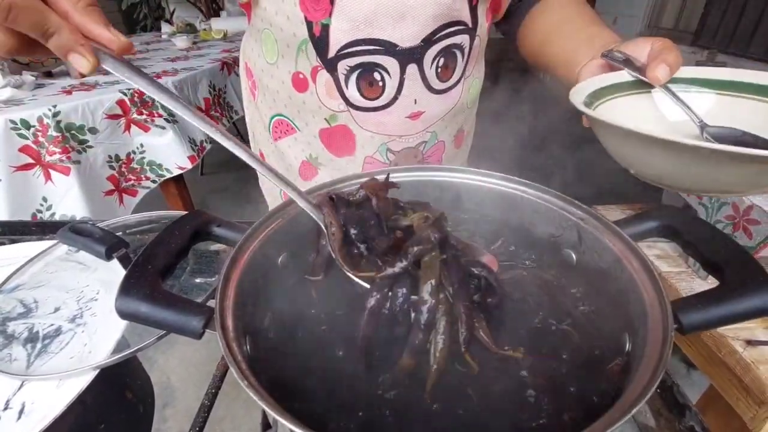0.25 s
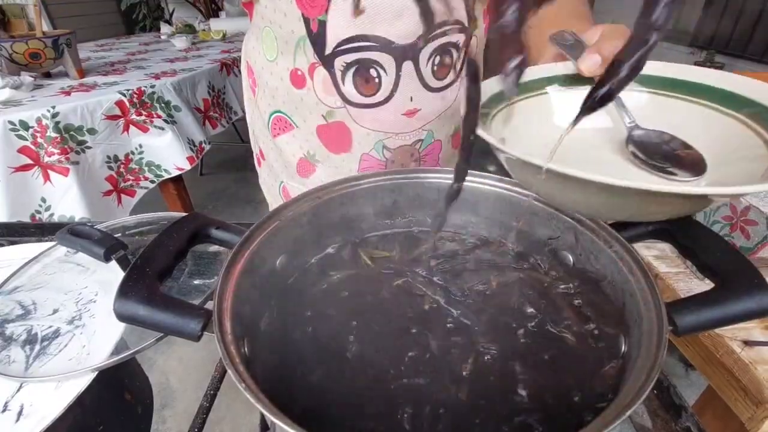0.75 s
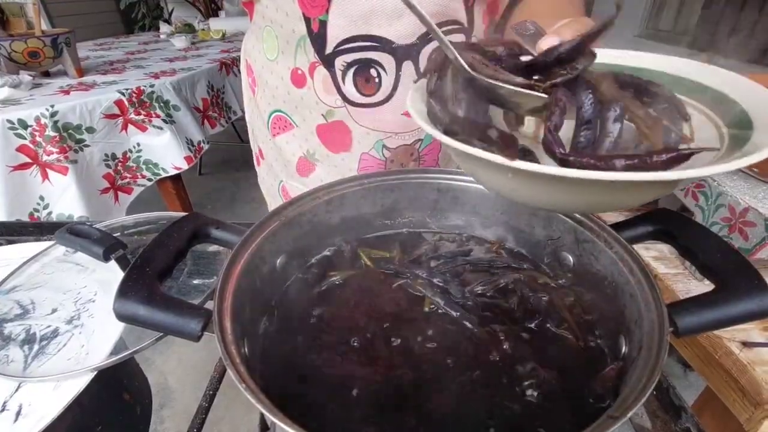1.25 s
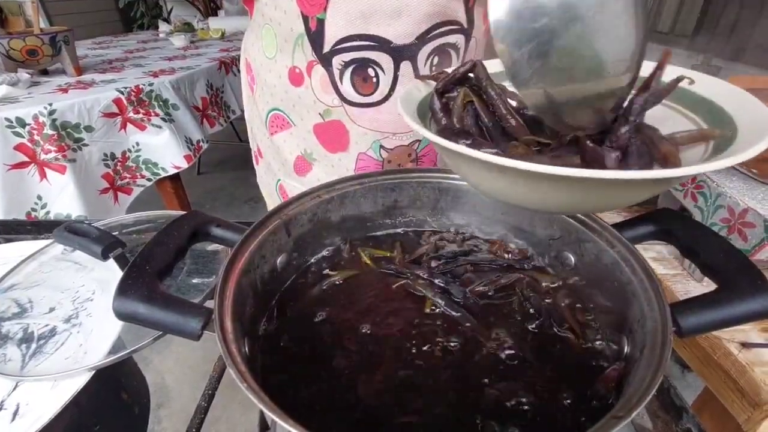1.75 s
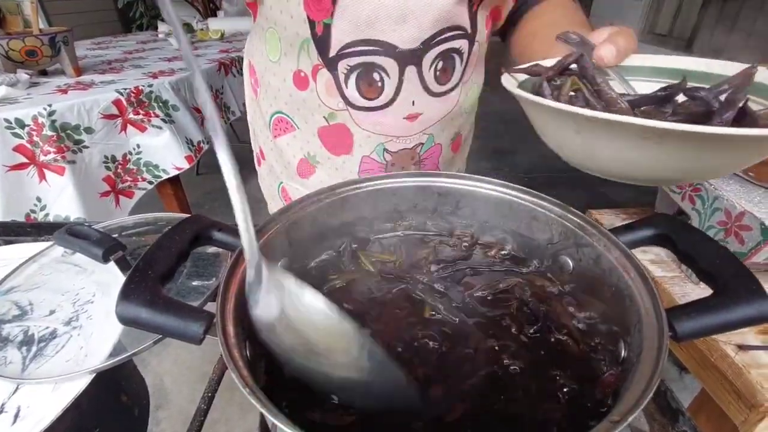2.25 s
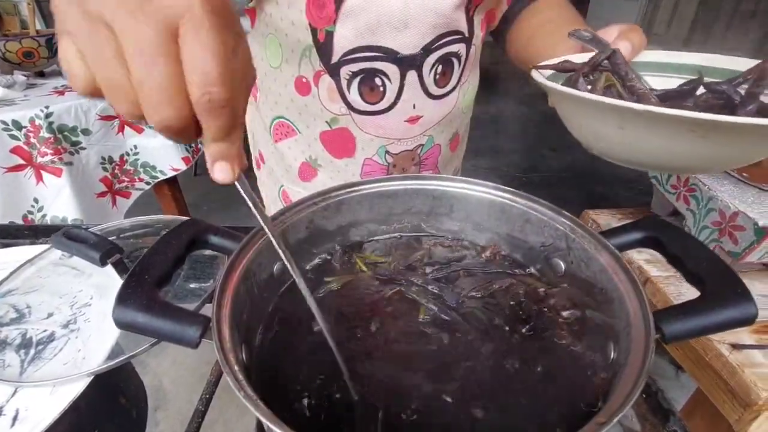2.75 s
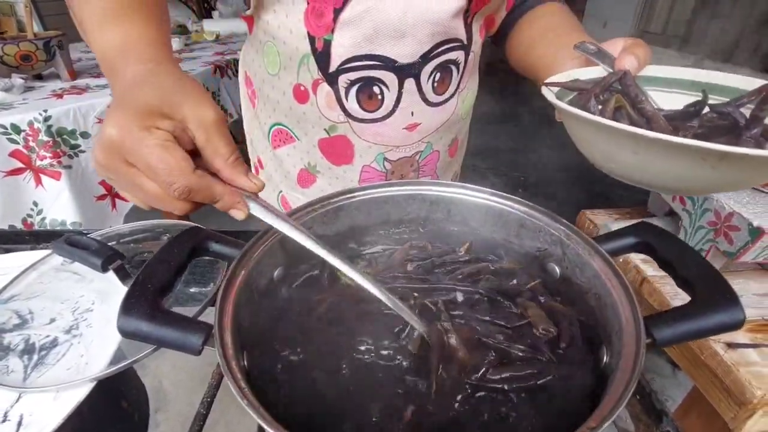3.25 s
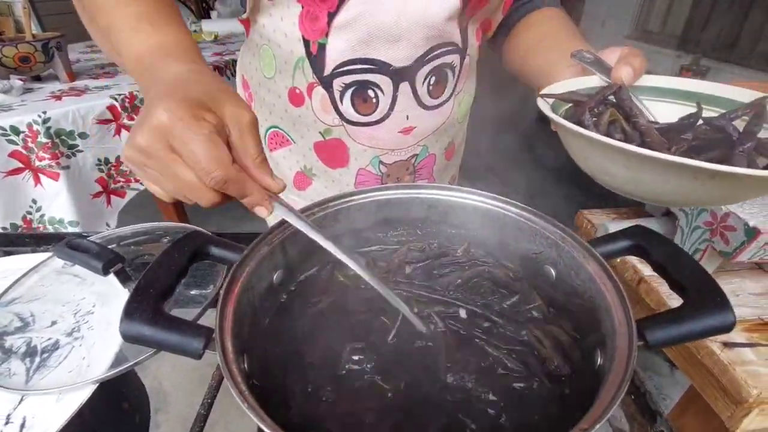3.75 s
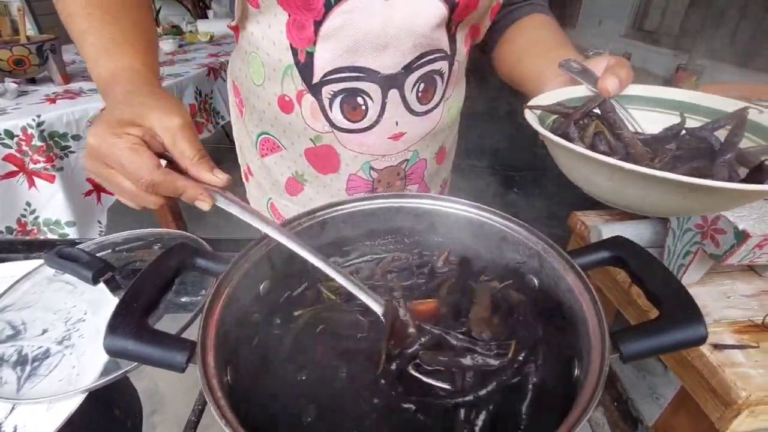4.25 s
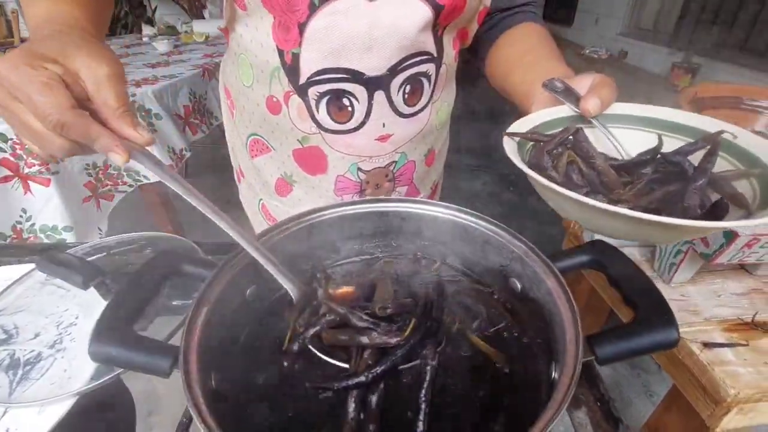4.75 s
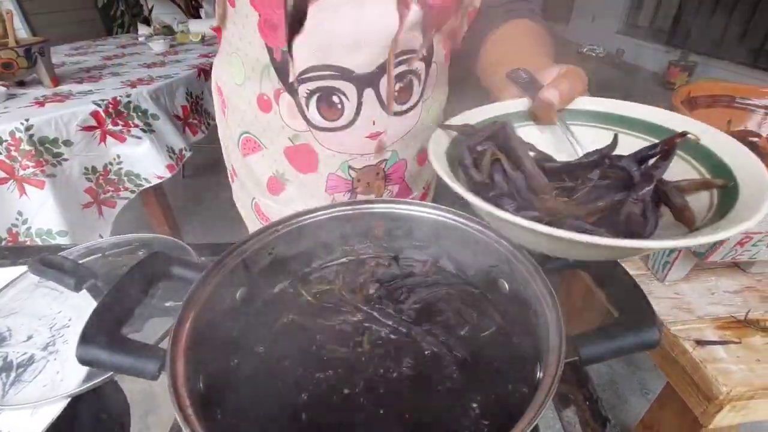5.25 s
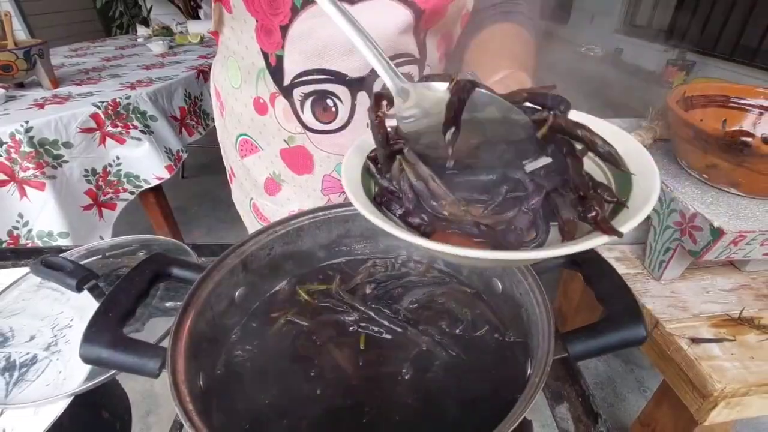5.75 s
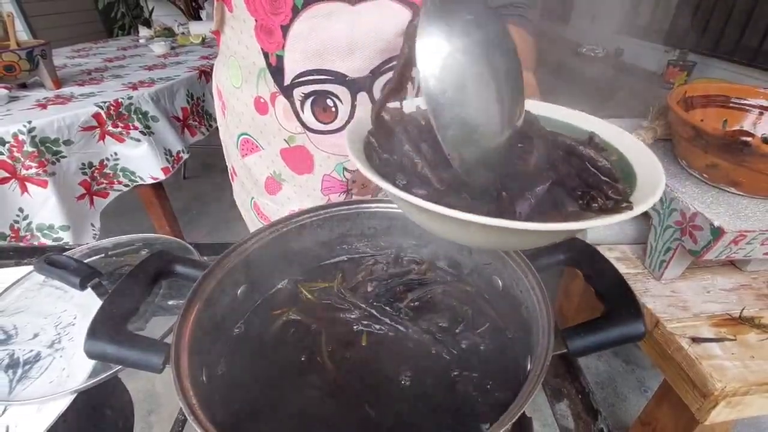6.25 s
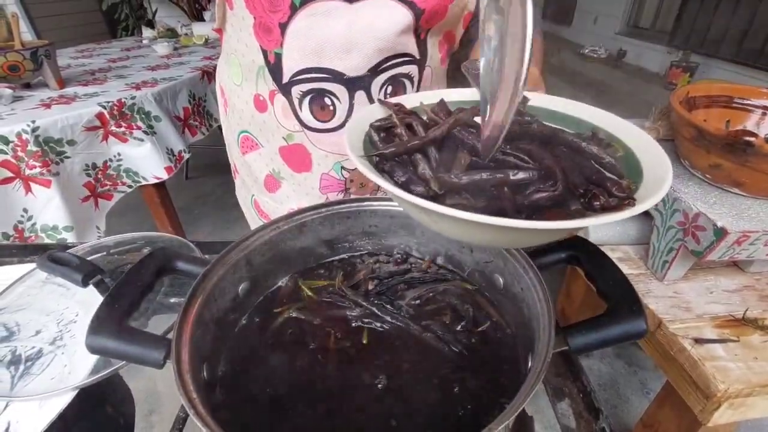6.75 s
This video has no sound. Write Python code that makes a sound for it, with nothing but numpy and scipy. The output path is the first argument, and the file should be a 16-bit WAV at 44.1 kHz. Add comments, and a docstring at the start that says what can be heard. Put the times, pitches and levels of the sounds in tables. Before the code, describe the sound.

Over soft outdoor air and faint hiss, a metal ladle serves cooked beans from a broth-filled steel pot. Light spoon scraping and a sharp bowl clink come first, then a hard pot clank, short scrape, dull underwater thuds and gentle stirring. Later come a muffled knock, quick drips, watery slops and a brief fizz. A low engine drone grows behind it. Near microphone, short open-yard echoes.

```python
"""Cooked beans are ladled from a steel pot into a ceramic bowl in a roofed yard, over outdoor air and hiss. A
distant engine, summed harmonics and rumble, sinks early, then grows and eases off at the very end. First a
spoon slides in the bowl and the ladle clinks on it: filtered contact noise and struck modes. The ladle then
clanks on the pot wall, drags across the bottom, bumps it under the broth and rustles the beans. Stirring slops
and the odd plink are chirped bubbles; later drops tick, beans slop out and one drop sizzles."""
import sys
import numpy as np
from scipy import signal
from scipy.fft import rfft, irfft, next_fast_len
from scipy.io import wavfile
from scipy.ndimage import uniform_filter1d

SR = 44100
rng = np.random.default_rng(int(sys.argv[2]) if len(sys.argv) > 2 else 0)


def master(y):
    """Save y as 16-bit WAV."""
    cut = np.clip(np.atleast_2d(y).T, -1, 1)
    pcm = np.round(cut * 32767)  # scale
    wavfile.write(sys.argv[1], SR, pcm.astype(np.int16))


N = 309141
TIME = np.arange(N) / SR
SHORT = TIME[:SR // 2]   # time within one event
CUTOFF_HZ = 16100

# Spectra of the outdoor air and the steady hiss: f/Hz, relative level/dB per Hz
AIR_COLOUR = [(22, -27.5), (45, -0.5), (70, -4.5), (90, 2), (110, -3.5), (230, -8.5), (330, -15.5),
              (500, -21.5), (800, -25.5), (1020, -34.5), (1260, -23.5), (1550, -37.5), (3500, -45),
              (8000, -69)]
HISS_COLOUR = [(2000, -19), (3800, -19.5), (5000, -7.5), (6000, -9.5), (7000, 0), (8200, -15.5),
               (9800, -15.5), (11000, -4), (12200, -1.5), (12900, -9.5), (13500, -18.5), (16000, -19.5)]
# Left-right likeness of all stereo noise: f/Hz, correlation (1 = alike)
STEREO_LIKENESS = [(60, 0.9), (250, 0.61), (640, 0.35), (1400, 0.12), (3000, 0), (16000, 0)]
# Balance of the air and hiss: f/Hz, left minus right level/dB
AIR_BALANCE = [(180, 4), (700, -2.5), (3000, -1), (4800, -5.5), (6800, -1), (10000, -2.5), (11200, -5.5),
               (12300, -14.5), (15000, -6.5)]
# Decay of the yard's echoes: f/Hz, t60/s
YARD_DECAY_TIMES = [(200, 0.73), (1800, 0.47), (4500, 0.27), (12000, 0.22)]

# Harmonics of the engine's firing and of its fan: multiple of the base pitch, relative level/dB
FIRING_HARMONICS = [(2, -14), (3, -18.5), (4, -6.5), (5, -6.5), (6, 0.5), (7, -9.5), (8, -18), (9, -18.5),
                    (10, -15.5), (11, -14), (12, -18.5)]
FAN_HARMONICS = [(1, -5.5), (2, -0.5), (3, -0.5), (4, -12.5)]
# Engine rumble: f/Hz, relative level/dB per Hz
RUMBLE_COLOUR = [(20, -37), (42, -10), (65, -9.5), (90, 2.5), (120, -3.5), (250, 2.5), (350, -9),
                 (500, -12), (750, -20), (1000, -31.5), (2500, -41), (6000, -79)]
# Loudness of the firing hum over time: t/s, level/dB
FIRING_LEVEL = [(0.08, -55.5), (0.19, -59), (1.2, -54.5), (1.85, -67.5), (2.76, -52), (4.88, -43),
                (6.33, -42), (6.9, -46)]
FIRING_HZ, FAN_HZ = 24.45, 86.4
PHASE_ORIGIN_S = 5.68   # both hums line up here, apart from the smear of their echoes
HUM_CENTRED_DB, HUM_LEAN = -45.5, 0.22   # centred at this level; leans left by dB per dB it is weaker
# The fan's whirr makes one swell: a slow rise, a hold and a quick fall
FAN_QUIET_DB, FAN_LOUD_DB = -74, -48
FAN_FULL_S, FAN_FADES_S = 4.84, 6.265
FAN_RISE_DB_PER_S, FAN_FALL_DB_PER_S = 6.5, 2.5   # fall of the fundamental; grows as multiple squared

# The ladle pushes through the pods
RUSTLE_S, RUSTLE_WIDTH_S, RUSTLE_TICKS_PER_S = 3.3, .11, 300
# A drop traps a small air bubble in the broth: t/s, level/dB
PLINK_EVENTS = [(0.969, -65), (5.262, -58.5), (6.53, -63)]
PLINK_HZ, PLINK_T60_S = 2350, .025
# The loudest drops: t/s, level/dB, f/Hz
LOUD_DROPS = [(4.6872, -53.5, 6650), (4.896, -52.5, 11300), (5.1538, -51, 12700), (5.2542, -49.5, 5320),
              (5.4126, -45, 12300), (5.4605, -50, 3120), (5.487, -52.5, 3160), (5.4992, -47, 12240)]
# While the full ladle drains, smaller drops fall at random: start t/s, end t/s
DRAINING_SPANS = [(4.6, 5.56)]
DROPS_PER_S, SMALL_DROP_DB, SMALL_DROP_HZ = 16, -57, 7400
SCATTER_DB, SCATTER_OCTAVES = 3, 0.58   # spread among the small slops and drops
# A drop boils away on hot metal: f/Hz, relative level/dB per Hz
SIZZLE_SPECTRUM = [(2500, -15), (3800, -9), (4900, -2), (6000, -9), (9800, -9), (10800, -4), (12500, 1),
                   (14000, -3), (16000, -5)]
SIZZLE_START_S, SIZZLE_DB, SIZZLE_ATTACK_S = 5.932, -58.8, 0.0026
SIZZLE_FADE_DB_PER_S, SIZZLE_LASTS_S = 47, 0.37
# The loudest slops of beans and ladle in the broth: t/s, level/dB, starting bubble f/Hz
LOUD_SLOPS = [(1.615, -42, 690), (1.907, -56, 705), (2.132, -56, 680), (2.419, -48, 680), (3.078, -50, 784),
              (4.09, -53.5, 785), (5.316, -46, 1004), (5.349, -49, 800), (5.816, -49, 1120),
              (5.915, -53, 1270), (6.253, -55, 1090), (6.266, -52.5, 1200), (6.381, -56.5, 1240),
              (6.457, -50.5, 1270)]
# While beans are stirred or tipped out, smaller slops come at random: start t/s, end t/s
STIRRING_SPANS = [(3.6, 4.3), (5.7, 6.4)]
SLOPS_PER_S, SMALL_SLOP_DB, SMALL_SLOP_HZ = 3, -59, 800

# Ringing modes of the steel pot, ladle and ceramic bowl: f/Hz, width/Hz, relative level/dB
POT_MODES = [(338.3, 8, -9), (458, 50, -5), (619, 40, -5), (807, 34, -8.5), (1052, 25, -3), (1228, 16, -2),
             (1394, 16, -5), (1560, 13, -4), (1995, 14, -6), (2196, 17, -8), (2702, 32, -7.5),
             (3542, 55, 0.5), (4059, 70, -7), (4226, 60, -5), (5060, 34, -4), (5150, 24, -10),
             (5420, 70, 0), (5500, 70, -6.5), (6525, 45, -9), (7060, 75, -4.5), (7450, 50, -8),
             (10900, 50, -12), (12650, 40, -15)]
LADLE_MODES = [(1402, 80, -6), (1750, 60, 4), (2945, 90, -4), (4470, 85, 0.5), (4930, 70, 4),
               (7305, 60, -4.5), (8370, 40, -9), (10180, 60, -10), (12368, 55, -8.5), (13197, 55, -4)]
BOWL_MODES = [(3050, 36, -2), (3844, 60, -8), (4630, 14, -2), (4740, 36, 3), (4915, 30, -6), (6298, 70, 3),
              (8095, 40, -9)]
# Wash of crowded modes, in air and under the broth: f/Hz, relative level/dB per Hz
DRY_WASH = [(80, -9), (200, 0), (470, 3), (700, -1), (1300, -2), (2200, -2), (3000, -9), (3500, -6),
            (5200, -5.5), (7500, -9.5), (8800, -18), (11000, -11.5), (13000, -13.5), (16000, -21.5)]
SUNK_WASH_COLOUR = [(100, -3), (200, 5), (520, -7), (750, -12), (1300, -19.5), (2000, -21.5), (3000, -27),
                    (3900, -19), (7600, -19), (9000, -29.5), (11500, -24), (16000, -36)]
# Edges of the low, middle, high and top band of a blow: f/Hz
BLOW_EDGES = [120, 500, 2500, 8000, 16000]
# Levels of those bands in each kind of blow, added to the event's own: level/dB
CLANK_BANDS = [-6, -1, 2, -4]
BUMP_BANDS = [3, -3, -0.5, -4]
CLINK_BANDS = [-13, -2, 5, 0]

# The spoon slides in the tilting bowl: t/s, length/s, level/dB
SPOON_STROKES = [(0.121, 0.17, -79.5), (0.467, 0.22, -78.5), (0.758, 0.045, -79), (1.092, 0.048, -73)]
SPOON_CATCHES_PER_S = 590
# Ladle on the bowl: t/s, level/dB, contact cut-off f/Hz, ladle ring over bowl level/dB
CLINK_EVENTS = [(1.553, -39.5, 17000, 7), (1.585, -48.5, 7950, -10), (1.753, -69, 6000, 0)]
# Ladle on the bottom, under the broth: t/s, click level/dB, thud level/dB, knock f/Hz, knock level/dB
BUMP_EVENTS = [(3.099, -45, -41.5, 700, -42), (3.863, -45, -35.5, 1100, -52.5)]
# After the hard clank the ladle drags across the pot's bottom, ever more lightly
DRAG_START_S, DRAG_LASTS_S, DRAG_DB, DRAG_FADE_DB_PER_S = 2.7, 0.38, -57.5, 45
DRAG_CATCHES_PER_S, DRAG_CONTACT_HZ = 300, 3600
# Ladle on the pot wall: t/s, level/dB, contact cut-off f/Hz, f/Hz that the struck place favours
CLANK_EVENTS = [(2.436, -39.5, 14100, 626), (2.499, -52, 11000, 1980), (2.656, -27, 17000, 5270),
                (2.841, -53.5, 5470, 1600), (2.883, -48, 1800, 810), (2.889, -49.5, 3000, 1700),
                (2.927, -57, 3000, 1400), (3.05, -63, 1800, 2200), (4.934, -38.5, 1300, 1250),
                (5.002, -46.5, 900, 810), (5.014, -56, 1200, 500)]
FAVOURED_DB, FAVOURED_OCTAVES = 7, .17   # lift and reach of the modes near that frequency


def from_db(db):
    """Decibels to gain."""
    return 10 ** (np.asarray(db) / 20)


def rms_one(x):
    """Scale to rms 1."""
    return x / np.sqrt(np.mean(x ** 2) + 1e-20)


def in_time(rows):
    """Each column of a curve at every sample."""
    s, *columns = np.transpose(rows)
    return [np.interp(TIME, s, column) for column in columns]


def at_hz(points, hz):
    """Read a table on a log-frequency axis."""
    table_hz, values = np.transpose(points)
    return np.interp(np.log(hz + 1), np.log(table_hz), values)


def band(x, low, high):
    """Causal band-pass."""
    return signal.sosfilt(signal.butter(3, [low, min(high, .45 * SR)], "band", fs=SR, output="sos"), x)


def softened(sound, contact_hz):
    """A soft or glancing contact cannot excite the treble."""
    return signal.sosfilt(signal.butter(2, min(contact_hz, .45 * SR), fs=SR, output="sos"), sound)


def fade(t60):
    """Decay over one event, 60 dB down after t60 seconds."""
    return from_db(-60 * SHORT / t60)


def pan(db):
    """Left and right gains; negative leans right."""
    return from_db(np.array([[1], [-1]]) * db / 2)


def add(out, s, sound):
    """Mix a sound in at time s."""
    start = int(s * SR)
    out[:, start:start + sound.shape[1]] += sound[:, :N - start]


def scattered(spans, per_s, db, hz):
    """Small events at uneven times within the spans: rows of t/s, level/dB, f/Hz."""
    slots = np.concatenate([np.arange(start, end - .5 / per_s, 1 / per_s) for start, end in spans])
    late, size, pitch = rng.uniform(-0.83, 1, (len(slots), 3)).T
    times = slots + (1 + late) / 2 / per_s
    return np.transpose([times, db + SCATTER_DB * size, hz * 2 ** (SCATTER_OCTAVES * pitch)])


def air_noise(size, colour=None, balance=None):
    """Stereo noise, alike in the bass and unrelated in the treble; rms 1."""
    padded = next_fast_len(size)
    mid, side = rfft(rng.standard_normal((2, padded)))
    hz = np.arange(len(mid)) * SR / padded
    alike = np.clip(at_hz(STEREO_LIKENESS, hz), -1, 1)
    both = np.sqrt(1 + alike) * mid + np.sqrt(1 - alike) * side * [[1], [-1]]
    if colour is not None:
        both = both * from_db(at_hz(colour, hz))
    if balance is not None:
        both = both * from_db(at_hz(balance, hz) * [[.5], [-.5]])
    return rms_one(irfft(both, padded)[:, :size])


def in_yard(sound, wet_db):
    """Add the scatter from roof and walls, whose treble dies first."""
    edges = np.geomspace(100, 17000, 8)
    noise = air_noise(len(SHORT))
    tail = 0
    for low, high in zip(edges, edges[1:]):
        t60 = at_hz(YARD_DECAY_TIMES, np.sqrt(low * high))
        tail = tail + band(noise, low, high) * fade(t60)
    tail = rms_one(tail * (1 - np.exp(-SHORT / .004))) / np.sqrt(len(SHORT))
    echoes = signal.fftconvolve(sound, tail, axes=1)[:, :len(SHORT)]
    return sound + from_db(wet_db) * echoes


def ringing(modes, damping):
    """Struck modes; each reaches the two ears with its own phase."""
    hz, width, db = np.transpose(modes)[:, :, None]
    ear_shift = rng.normal(0, 1, (2, *hz.shape)) * np.minimum(hz / 2400, 1.8)
    phase = rng.uniform(0, 2 * np.pi, hz.shape) + ear_shift
    decay = np.exp(-np.pi * width * damping * SHORT)
    partials = np.sin(2 * np.pi * hz * SHORT + phase) * decay
    return rms_one(np.sum(from_db(db) * np.sqrt(width) * partials, axis=1))


def blow(ring, wash, band_db, crack_t60, clatter_t60, clatter_db, wet_db, rise_s):
    """A contact: crack and crowded-mode wash echo in the yard around a clear, close ring."""
    crack = rms_one(air_noise(len(SHORT), wash) * fade(crack_t60))
    clatter = from_db(clatter_db) * rms_one(air_noise(len(SHORT), wash) * fade(clatter_t60))
    rise = 1 - np.exp(-SHORT / rise_s)
    sound = in_yard((crack + clatter) * rise, wet_db) + ring * rise
    out = 0
    for low, high, db in zip(BLOW_EDGES, BLOW_EDGES[1:], band_db):
        part = band(sound, low, high)
        # level each band by its loudest 5 ms
        power = uniform_filter1d(np.mean(part ** 2, axis=0), size=SR // 200, mode="constant")
        out = out + from_db(db) * part / np.sqrt(power.max())
    return out


def background():
    """Outdoor air and a faint steady hiss, both steady coloured noise."""
    air = from_db(-57.0) * air_noise(N, AIR_COLOUR, AIR_BALANCE)
    hiss = from_db(-71.5) * air_noise(N, HISS_COLOUR, AIR_BALANCE)
    return air + hiss


def hum(base_hz, orders, waver_db, spread):
    """Harmonics of a turning shaft; echoes smear its pulses, let each line waver and set the ears apart."""
    out, knots = 0, np.linspace(0, N / SR, 40)
    for multiple, db in orders:
        hz = base_hz * multiple
        smear = ((hz - 2 * FAN_HZ) / 42) ** 2 + rng.normal() * (hz - 2 * FAN_HZ) / 40
        waver = np.interp(TIME, knots, rng.standard_normal(len(knots)))
        ears = spread * rng.choice([-1, 1]) * np.array([[1], [-1]])
        line = np.cos(2 * np.pi * hz * (TIME - PHASE_ORIGIN_S) + smear + ears)
        out = out + from_db(db + waver_db * waver) * np.sqrt(2) * line
    return out


def engine():
    """Firing hum, a fan whirr whose upper harmonics fade first, and a broad rumble that swells with the hum."""
    firing_db, = in_time(FIRING_LEVEL)
    rise_db = FAN_RISE_DB_PER_S * np.maximum(FAN_FULL_S - TIME, 0)
    fan_db = np.maximum(FAN_LOUD_DB - rise_db, FAN_QUIET_DB)
    fall_db = FAN_FALL_DB_PER_S * np.maximum(TIME - FAN_FADES_S, 0)
    fan_orders = [(multiple, db - fall_db * multiple ** 2) for multiple, db in FAN_HARMONICS]
    lean = pan(HUM_LEAN * (HUM_CENTRED_DB - firing_db))
    firing = from_db(firing_db - 0.13) * lean * hum(FIRING_HZ, FIRING_HARMONICS, waver_db=0.33, spread=0.3)
    fan = from_db(fan_db) * pan(-1.2) * hum(FAN_HZ, fan_orders, waver_db=2.0, spread=0.14)
    rumble = from_db(firing_db - 10.5 - 2 * fall_db) * pan(-0.72) * air_noise(N, RUMBLE_COLOUR)
    return firing + fan + rumble


def wet_beans():
    """Wet pods shift and stick: a very faint, uneven crackle that thickens as the ladle pushes through."""
    per_s = 14 + RUSTLE_TICKS_PER_S * np.exp(-((TIME - RUSTLE_S) / RUSTLE_WIDTH_S) ** 2)
    ticks = (rng.random(N) < per_s / SR) * from_db(rng.normal(0, 2.8, N))
    tick = in_yard(band(air_noise(len(SHORT)), 3800, 7000) * fade(.025), wet_db=-5.0)
    return from_db(-70) * pan(-1.7) * signal.fftconvolve(ticks[None], tick, axes=1)[:, :N]


def plinks():
    """A trapped bubble rings briefly and rises a little in pitch."""
    out = np.zeros((2, N))
    tone = np.sin(2 * np.pi * PLINK_HZ * SHORT * (1 + 1.5 * SHORT))
    bubble = tone * fade(PLINK_T60_S) * (1 - np.exp(-SHORT / 0.00071))
    for s, db in PLINK_EVENTS:
        add(out, s, from_db(db) * in_yard(pan(-1.2) * bubble, wet_db=-1.5))
    return out


def drips():
    """Drops off the lifted beans tick for a few cycles."""
    out = np.zeros((2, N))
    small_drops = scattered(DRAINING_SPANS, DROPS_PER_S, SMALL_DROP_DB, SMALL_DROP_HZ)
    for s, db, hz in [*LOUD_DROPS, *small_drops]:
        tick = np.sin(2 * np.pi * hz * SHORT) * fade(12 / hz)
        spray = 1.3 * band(rng.standard_normal((2, len(SHORT))), 4200, 20000) * fade(0.0044)
        add(out, s, from_db(db) * in_yard(tick + spray, wet_db=-6.5))
    return pan(-1.6) * out


def sizzle():
    """Dense noisy fizz that starts at once, fades unevenly as the drop shrinks and stops when it is dry."""
    age = np.maximum(TIME - SIZZLE_START_S, 0)
    wet = (1 - np.exp(-age / SIZZLE_ATTACK_S)) * np.clip(1 - (age / SIZZLE_LASTS_S) ** 4, 0, 1)
    grain = rms_one(uniform_filter1d(rng.standard_normal(N), size=50))
    flutter = rms_one(uniform_filter1d(rng.standard_normal(N), size=900))
    level_db = SIZZLE_DB - SIZZLE_FADE_DB_PER_S * age + 1.9 * grain + 1.1 * flutter
    return wet * from_db(level_db) * pan(-18.0) * air_noise(N, SIZZLE_SPECTRUM)


def slops():
    """Each slop is a wet smack and a small bubble that rises in pitch."""
    out = np.zeros((2, N))
    small_slops = scattered(STIRRING_SPANS, SLOPS_PER_S, SMALL_SLOP_DB, SMALL_SLOP_HZ)
    for s, db, hz in [*LOUD_SLOPS, *small_slops]:
        bubble = .8 * np.sin(2 * np.pi * hz * SHORT * (1 + 6 * SHORT)) * fade(15 / hz)
        splash = rms_one(band(air_noise(len(SHORT)), .65 * hz, 1.47 * hz))
        smack = .58 * splash * (fade(0.019) + 0.06 * fade(0.21))
        rise = 1 - np.exp(-SHORT / 0.00031)
        add(out, s, from_db(db) * in_yard((bubble + smack) * rise, wet_db=-8.5))
    return pan(-2.2) * out


def spoon_slides():
    """The spoon catches on the glaze many times a second and faintly stirs the bowl's upper modes."""
    out = np.zeros((2, N))
    for s, length, db in SPOON_STROKES:
        stroke = np.sin(np.pi * np.minimum(SHORT / length, 1))
        catches = (rng.random(len(SHORT)) < SPOON_CATCHES_PER_S / SR) * rng.normal(0, 1, len(SHORT))
        scratch = 1.8 * rms_one(air_noise(len(SHORT)) * fade(0.011))
        body = band(ringing(BOWL_MODES, damping=2.6) + scratch, 1900, 6600)
        scrape = signal.fftconvolve((catches * stroke)[None], body, axes=1)[:, :len(SHORT)]
        # a shorter stroke gets less of the energy, so the level holds during the stroke
        gain = from_db(db) * np.sqrt(length / SHORT[-1])
        add(out, s, gain * in_yard(rms_one(scrape), wet_db=-11.0))
    return pan(-1.9) * out


def bowl_clinks():
    """The ladle clinks on the bowl and both ring; on the rebound the bowl rings almost alone."""
    out = np.zeros((2, N))
    for s, db, contact_hz, ladle_db in CLINK_EVENTS:
        ladle = from_db(ladle_db) * ringing(LADLE_MODES, damping=1)
        ring = from_db(6.0) * rms_one(ringing(BOWL_MODES, damping=1) + ladle)
        sound = blow(ring, DRY_WASH, db + np.array(CLINK_BANDS), crack_t60=0.04, clatter_t60=0.11,
                     clatter_db=-2.5, wet_db=-10, rise_s=0.0045)
        add(out, s - .001, softened(sound, contact_hz))   # starts 1 ms before the listed time
    return from_db(0.5) * pan(-3.5) * out


def bottom_bumps():
    """Broth smothers the pot's modes: a bump gives a dull click, a hollow knock and a thud of the base."""
    out = np.zeros((2, N))
    for s, db, thud_db, knock_hz, knock_db in BUMP_EVENTS:
        click = blow(0, SUNK_WASH_COLOUR, db + np.array(BUMP_BANDS), crack_t60=0.047, clatter_t60=0.094,
                     clatter_db=-3, wet_db=-10.5, rise_s=0.0015)
        hollow = band(air_noise(len(SHORT)), 0.764 * knock_hz, 1.25 * knock_hz)
        knock = from_db(knock_db) * rms_one(hollow) * fade(.12)
        thud = from_db(thud_db) * np.sin(2 * np.pi * 210 * SHORT) * fade(0.26)
        body = (knock + thud) * (1 - np.exp(-SHORT / .002))
        add(out, s, click + body)
    return from_db(1.65) * pan(-3.5) * out


def ladle_drag():
    """Steel catches on steel many times a second; each catch briefly stirs the pot's crowded modes afresh."""
    out = np.zeros((2, N))
    catches = (rng.random(len(SHORT)) < DRAG_CATCHES_PER_S / SR) * rng.exponential(1, len(SHORT))
    stirred = signal.fftconvolve(catches, fade(0.025))[:len(SHORT)]
    scrape = rms_one(softened(stirred * air_noise(len(SHORT), DRY_WASH), DRAG_CONTACT_HZ))
    pressure = from_db(DRAG_DB - DRAG_FADE_DB_PER_S * SHORT) * (SHORT < DRAG_LASTS_S)
    add(out, DRAG_START_S, in_yard(pressure * scrape, wet_db=-6.0))
    return pan(-1.6) * out


def pot_clanks():
    """Ladle and pot wall ring together; each place on the wall brings out other modes."""
    out = np.zeros((2, N))
    hz, width, mode_db = np.transpose(POT_MODES)
    for s, db, contact_hz, favoured_hz in CLANK_EVENTS:
        octaves_away = np.log2(hz / favoured_hz)
        lift_db = FAVOURED_DB * np.exp(-(octaves_away / FAVOURED_OCTAVES) ** 2)
        # after a light touch the ladle stays on the wall and damps it
        pressed = 1 + np.clip((-28 - db) / 20, 0, 1)
        pot = ringing(np.transpose([hz, width, mode_db + lift_db]), damping=pressed)
        ring = from_db(-0.5) * pot + from_db(-14) * ringing(LADLE_MODES, damping=1)
        sound = blow(ring, DRY_WASH, db + np.array(CLANK_BANDS), crack_t60=0.012, clatter_t60=0.078,
                     clatter_db=-3.5, wet_db=-8.8, rise_s=0.00043)
        add(out, s + .001, softened(sound, contact_hz))   # starts 1 ms after the listed time
    return from_db(2.0) * pan(-1.0) * out


def scene():
    """Food and metal at the stove, over the engine and the outdoor background."""
    distant = background() + engine()
    food = wet_beans() + plinks() + drips() + sizzle() + slops()
    metal = spoon_slides() + bowl_clinks() + bottom_bumps() + ladle_drag() + pot_clanks()
    return distant + food + metal


def record(dry):
    """The top is cut steeply."""
    return signal.sosfilt(signal.ellip(10, .3, 80, CUTOFF_HZ, fs=SR, output="sos"), dry)


dry = scene()
out = record(dry)
master(out)
```